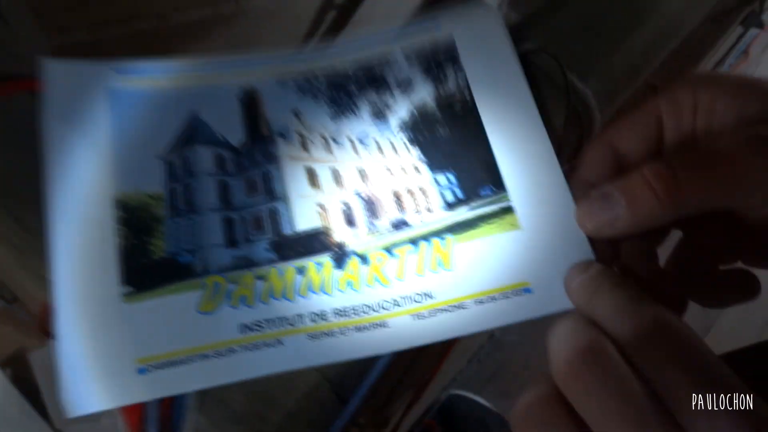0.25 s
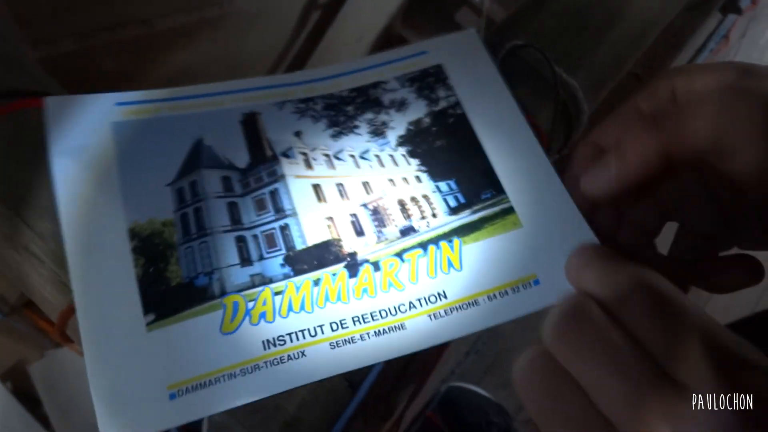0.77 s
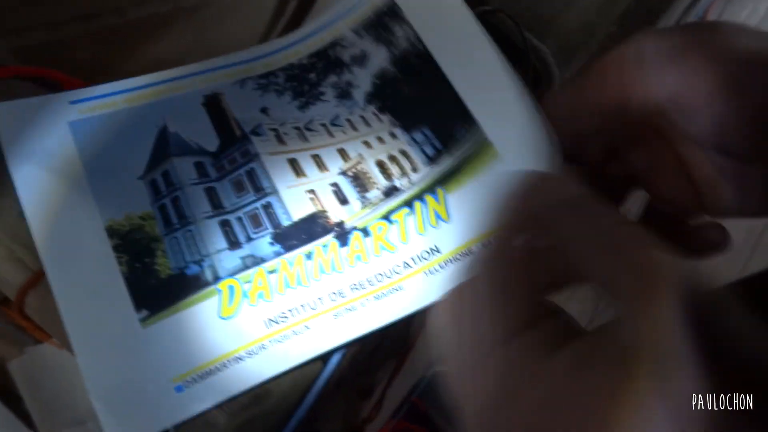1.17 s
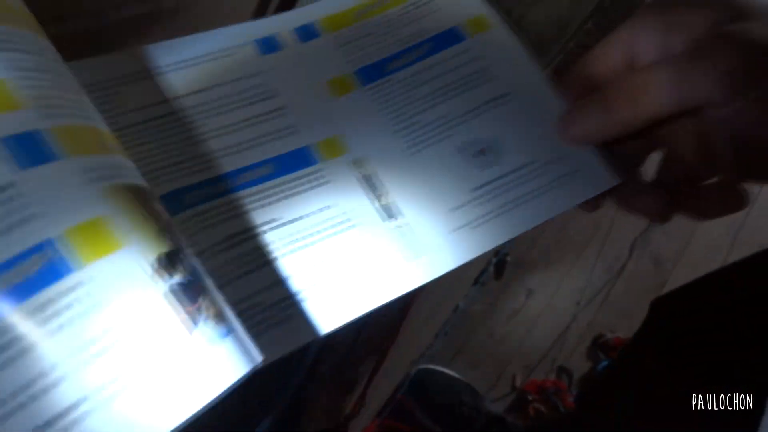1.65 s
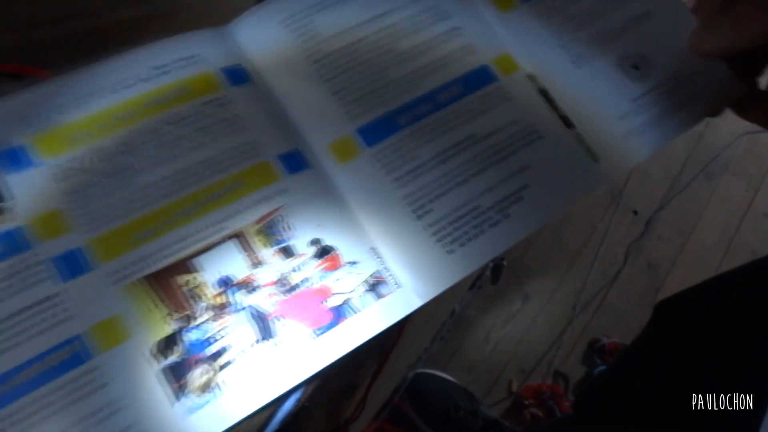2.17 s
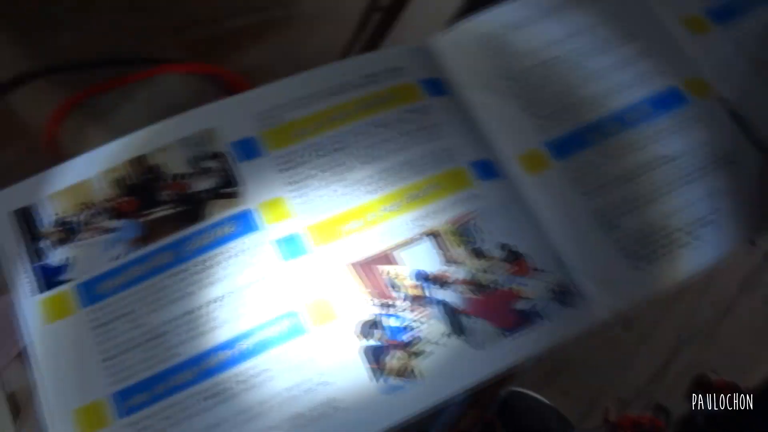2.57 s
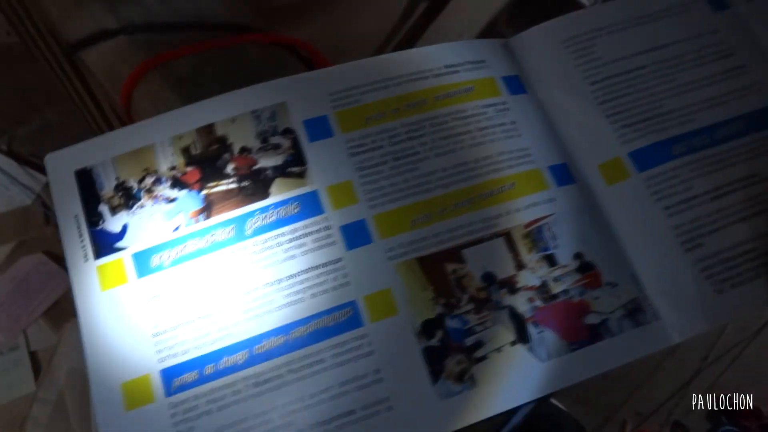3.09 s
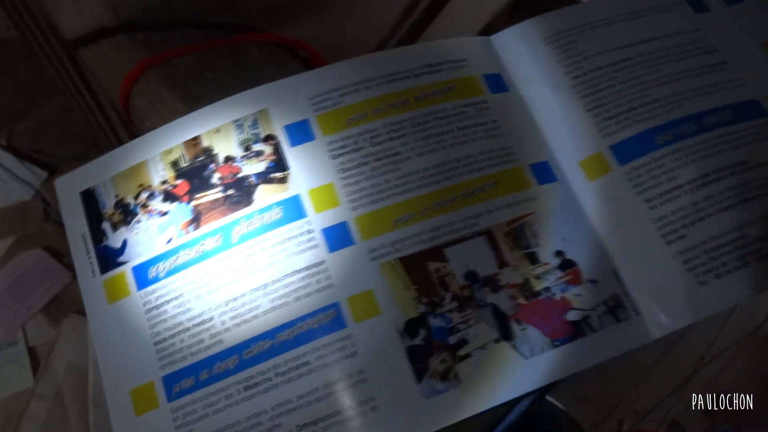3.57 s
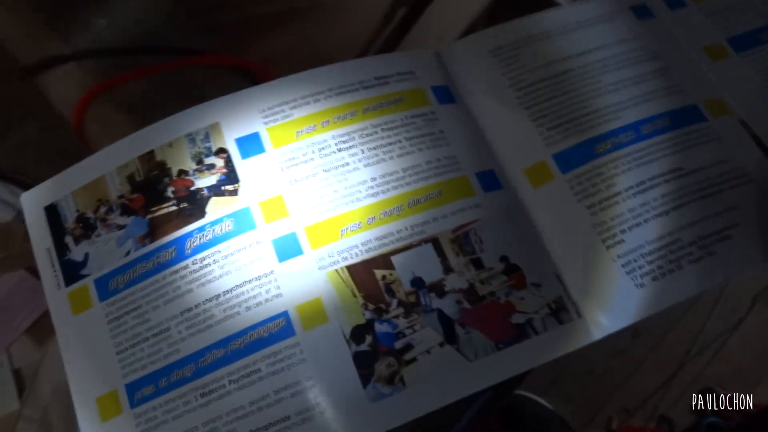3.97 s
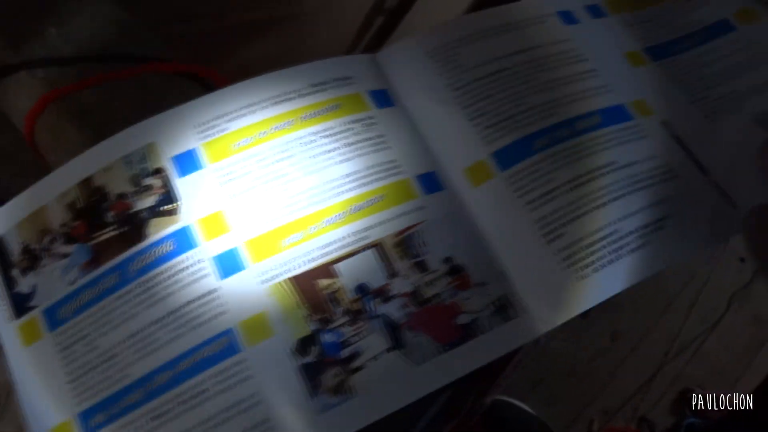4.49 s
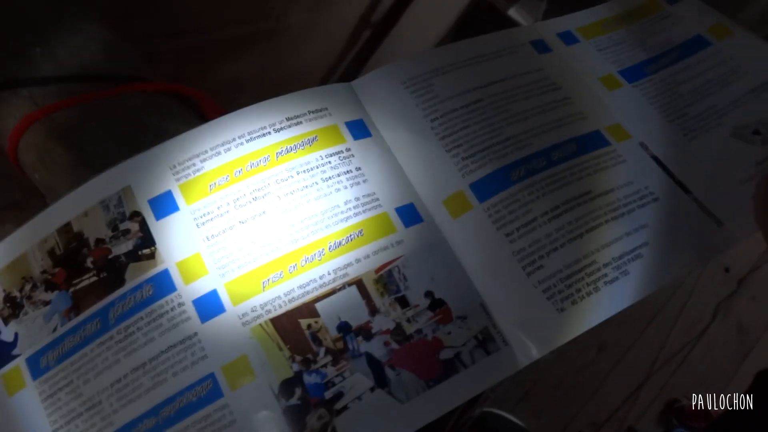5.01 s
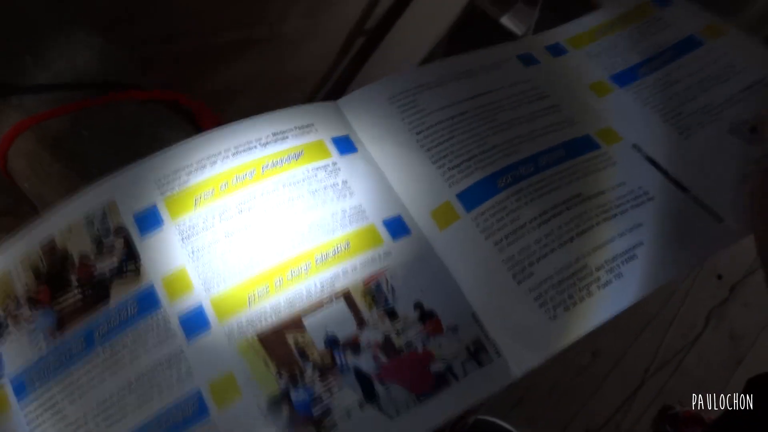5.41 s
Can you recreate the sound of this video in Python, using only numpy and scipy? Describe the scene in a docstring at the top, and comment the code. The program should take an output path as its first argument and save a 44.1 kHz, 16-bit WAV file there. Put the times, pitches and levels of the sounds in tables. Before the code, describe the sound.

Very close to the microphone in a small, quiet room, fingers slide faintly over a glossy brochure and tick its edge. At about two seconds it opens with a loud, crisp swish, snaps and hollow page flaps. Near silence follows, then soft rubbing and a tight burst of crinkles around five seconds, with another snap later.

```python
"""Glossy paper slides under fingers close to the microphone: a brochure opens in a small, quiet room.
Filtered noise and clustered friction clicks make the hiss of each stroke and the brief edge scuffs.
Damped clicks with noisy tails make the crease snaps and the dull pops of the buckling page.
Low filtered noise adds the bending sheet and the shifting hands; sparse echoes and room tone lie behind."""
import sys
import numpy as np
from scipy import signal
from scipy.fft import rfft, irfft
from scipy.io import wavfile
from scipy.ndimage import uniform_filter1d

SR = 44100
rng = np.random.default_rng(int(sys.argv[2]) if len(sys.argv) > 2 else 0)


def generate_wav(signal):
    """Clip the signal to [-1, 1] and save it as 16-bit WAV at the path in sys.argv[1]."""
    frames = np.transpose(np.atleast_2d(signal))
    scaled = np.clip(frames, -1, 1) * 32767
    pcm = np.round(scaled).astype(np.int16)
    wavfile.write(sys.argv[1], SR, pcm)


N = 249027


# strokes of sliding paper: (contact, time of peak [s], length [s], relative level [dB], treble lift [dB])
STROKES = [("cover", 0.021, 0.17, -50, -15), ("cover", .13, 0.083, -52, -6),
           ("cover", 0.337, 0.14, -55.5, -4), ("cover", 0.475, 0.12, -52.5, 2.7),
           ("cover", 0.675, 0.088, -55.5, 3.2), ("cover", 0.788, 0.081, -51.5, 5),
           ("lift", 0.819, 0.075, -47, 5.4), ("lift", 1.0, .21, -45.5, -7), ("lift", 1.116, 0.092, -49, -7),
           ("lift", 1.245, .05, -52.5, -5), ("lift", 1.37, 0.17, -53, 3),
           ("lift", 1.513, 0.31, -53.5, -8.5), ("lift", 1.655, 0.14, -48, -2.5),
           ("lift", 1.74, .14, -44, -7.5), ("sweep", 1.778, .022, -29, 8), ("sweep", 1.809, .05, -26, -1.5),
           ("sweep", 1.883, .06, -27, 5), ("turn", 1.923, .045, -33.5, 2), ("turn", 1.98, 0.1, -30.5, 3.4),
           ("turn", 2.052, .025, -26, -1), ("turn", 2.092, 0.062, -29.5, 8),
           ("turn", 2.135, 0.044, -38.5, 4), ("glide", 2.17, .12, -61, -1),
           ("glide", 2.54, 0.19, -66.5, -1), ("glide", 2.686, 0.19, -61.5, 0),
           ("glide", 3.129, .2, -55, 0.85), ("grip", 3.255, .14, -54.5, 4.3),
           ("grip", 3.475, 0.24, -56.5, 6.7), ("grip", 3.67, .1, -51, -2.5),
           ("grip", 3.73, 0.058, -56.5, 6.3), ("grip", 3.91, 0.13, -65.5, 22), ("grip", 4.02, .11, -52, 9),
           ("grip", 4.14, 0.13, -50.5, 9.4), ("grip", 4.26, .05, -58.5, 20),
           ("grip", 4.33, 0.092, -55.5, 6.7), ("grip", 4.48, 0.11, -41, 1.4),
           ("grip", 4.562, .065, -38, -0.54), ("grip", 4.65, .1, -63, 4), ("grip", 4.715, .04, -41.5, 1.7),
           ("grip", 4.78, 0.065, -45.5, 7.8), ("grip", 4.885, 0.099, -41.5, 6),
           ("grip", 4.985, 0.057, -38.5, 0), ("grip", 5.1, 0.12, -53, 4.1), ("grip", 5.3, 0.043, -49.5, -1),
           ("grip", 5.345, 0.07, -53.5, 5), ("grip", 5.398, 0.024, -42, -1),
           ("grip", 5.485, 0.09, -41.5, -2), ("grip", 5.61, 0.2, -49, 1)]


def stroke(contact, hiss, per_s, smooth, clump_db, band_hz, band_width_hz, band_db, creep_db):
    """Paper slides, and creeps on between strokes: slips clump, one band is shaped, the treble varies."""
    rows = [row[1:] for row in STROKES if row[0] == contact]
    t = np.arange(N) / SR
    between = 1. * (t > rows[0][0]) * (t < rows[-1][0])
    creep = gain_of(creep_db) ** 2 * abs(uniform_filter1d(between, size=SR // 20))
    swells = [swell(s, length, db) for s, length, db, _ in rows]
    power = sum(swells) + creep + 1e-20
    bright_db = sum(part * row[3] for part, row in zip(swells, rows)) / power

    friction = slips(N, per_s, 2.8, smooth) * gain_of(clump_db * wander(N, 0.0044))
    spectrum = read(hiss, bins()) + bumps([(band_hz, band_width_hz, band_db)])
    rub = evened(colour(friction, spectrum))
    highpass = signal.butter(3, 6500, "high", fs=SR, output="sos")
    treble = signal.sosfiltfilt(highpass, rub)
    lift = gain_of(bright_db)
    treble_share = np.mean(treble ** 2)
    # the treble lift changes the tone, while the power is held to the stroke
    level = np.sqrt(power / (1 + treble_share * (lift ** 2 - 1)))
    return (rub + (lift - 1) * treble) * level


# hiss of each contact: (frequency [Hz], relative level [dB per Hz])
COVER_HISS = [(530, -47), (900, -12.5), (1920, -23.5), (2260, -8.5), (2470, -15.5), (4000, -6.5),
              (6340, -8), (7530, 0.5), (8640, -6.5), (9470, 1.5), (10500, -20), (12100, -20), (14000, -63)]
LIFT_HISS = [(880, -49), (1500, -28), (1930, -22), (2810, -13), (3890, -7), (4290, -3.5), (4680, -5),
             (9630, -10), (10500, -21.5), (11900, -22.5), (15000, -43)]
SWEEP_HISS = [(880, -36.5), (1500, -21), (2670, -11), (3670, -3.5), (5050, -3.5), (7870, -6), (9600, -11),
              (10500, -24), (12000, -26), (13200, -53), (15500, -56.5)]
TURN_HISS = [(1180, -30), (2000, -10.5), (2450, -11.5), (2830, -1.5), (3860, 3.5), (6680, 3), (9600, -8),
             (10500, -16), (12000, -18.5), (13200, -38), (15500, -37.5)]
GLIDE_HISS = [(1060, -57.5), (1800, -17), (2290, -5), (2510, -10), (3190, -0.5), (4330, 3.5), (5450, 0),
              (6540, -15), (7980, -2), (9570, -16), (10300, -23.5), (13000, -34)]
GRIP_HISS = [(120, -32.5), (310, -7), (460, -22), (620, -2), (820, -3.5), (1100, -19.5), (1400, -11.5),
             (2160, 0.5), (2800, -3), (3670, 2.5), (6100, -5.5), (9300, -11), (10400, -32), (11900, -29.5),
             (13500, -56)]


def sliding():
    """Fingers on the glassy cover; it lifts, sweeps and turns; a soft glide; a rougher grip on the pages."""
    cover = stroke("cover", COVER_HISS, per_s=2800, smooth=0.86, clump_db=1.6,
                   band_hz=9500, band_width_hz=410, band_db=3.5, creep_db=-68)
    lift = stroke("lift", LIFT_HISS, per_s=3400, smooth=0.87, clump_db=1.0,
                  band_hz=9330, band_width_hz=400, band_db=6.5, creep_db=-65)
    sweep = stroke("sweep", SWEEP_HISS, per_s=2400, smooth=0.62, clump_db=0.3,
                   band_hz=5160, band_width_hz=800, band_db=5.5, creep_db=-43.5)
    turn = stroke("turn", TURN_HISS, per_s=990, smooth=0.49, clump_db=2.0,
                  band_hz=7660, band_width_hz=1200, band_db=-3.5, creep_db=-46.5)
    glide = stroke("glide", GLIDE_HISS, per_s=3600, smooth=0.59, clump_db=1.5,
                   band_hz=9180, band_width_hz=504, band_db=6.5, creep_db=-84.5)
    grip = stroke("grip", GRIP_HISS, per_s=1500, smooth=0.51, clump_db=2.0,
                  band_hz=7315, band_width_hz=460, band_db=10.5, creep_db=-69)
    return cover + lift + sweep + turn + glide + grip


def drifting(x, depth_db):
    """As the sheet changes its curve, the bands that it radiates best shift."""
    z = signal.stft(x, SR, nperseg=512)[2]
    field = rng.standard_normal(z.shape)
    for _ in range(2):
        field = uniform_filter1d(field, size=5, axis=0)   # over frequency
        field = uniform_filter1d(field, size=16, axis=1)  # over time
    return signal.istft(z * gain_of(depth_db * evened(field)), SR, nperseg=512)[1][:N]


# creases that snap: (time [s], relative level [dB], centre [Hz], width [octaves],
# rattle energy against the click [dB])
SNAPS = [(0.0319, -27, 4140, 2.5, -7), (0.039, -32, 4640, 0.68, -20), (0.2687, -37.5, 2720, 0.35, -3),
         (0.3405, -34.5, 3390, 1.4, -5), (0.8439, -27, 4370, 0.089, -12), (1.0659, -28, 3540, 0.44, 8),
         (1.0717, -22.5, 4300, 0.61, -17), (1.14, -20, 4900, 0.5, 0), (1.218, -37.5, 4800, 0.26, 5),
         (1.6051, -23, 5160, 0.37, 2), (1.783, -19, 5540, 0.32, -5), (1.8508, -15.5, 2230, 2.7, -9),
         (2.0342, -11.5, 2280, 1, -4), (2.1321, -15, 5300, 0.25, -11), (2.142, -19, 3640, 0.76, -2.5),
         (3.2558, -39.5, 4500, 0.48, 11.5), (4.0292, -31.5, 6800, 0.2, -5.5),
         (4.3324, -37.5, 3040, 0.35, -13), (4.4009, -28, 3660, 0.45, -1), (4.4221, -22, 3600, 0.45, 2.5),
         (4.4647, -20, 3100, 0.3, -7), (4.8466, -28, 3900, 0.48, 1), (4.9074, -10.5, 3220, 1.1, -1),
         (4.9397, -10, 3030, 0.87, -2.5), (4.955, -6, 4800, 0.61, -16.5), (5.2935, -34, 3340, 0.52, -1),
         (5.4328, -25.5, 2930, 0.34, -3), (5.4392, -8.5, 3180, 0.32, -8.5), (5.4927, -18.5, 3150, 0.35, -5),
         (5.636, -19, 3100, 0.39, -10)]


def snaps(rattle_s=0.0033, onset_s=0.00027):
    """A crease flips in an instant; bending waves rattle on in the sheet for a few milliseconds."""
    out, t = np.zeros(N), np.arange(SR // 25) / SR
    for s, db, hz, octaves, rattle_db in SNAPS:
        click = ring(patch(hz, octaves, skirt=2.9))
        rattle = rng.standard_normal(len(t)) * np.exp(-t / rattle_s) * (1 - np.exp(-t / onset_s))
        drive = gain_of(rattle_db) * rattle / np.linalg.norm(rattle)
        drive[0] = 1
        add(out, s, gain_of(db) * signal.fftconvolve(drive, click) / abs(click).max())
    return out


# bulges that buckle or flap: (time [s], relative level [dB], centre [Hz], width [octaves])
POPS = [(0.599, -52, 1290, 0.23), (1.056, -44.5, 800, 0.44), (1.071, -47, 248, 0.55),
        (1.3023, -47, 940, 0.58), (1.606, -40.5, 446, 0.53), (1.8502, -27.5, 940, 0.34),
        (1.9174, -17, 550, 1.1), (1.9678, -14, 990, 1.3), (2.0469, -13.5, 1060, 0.45),
        (2.056, -13, 1400, 0.59), (2.0712, -10.5, 1020, 0.59), (2.0766, -8, 870, 0.96),
        (2.1107, -9.5, 400, 0.93), (2.1323, -29.5, 300, 0.42), (2.183, -35.5, 245, 0.47),
        (2.191, -33, 1150, 0.25), (2.1932, -32.5, 450, 0.53), (2.27, -49.5, 380, 0.31),
        (2.7174, -49, 986, 0.52), (4.963, -27.5, 507, 0.48), (4.975, -21, 546, 0.58),
        (4.9847, -22.5, 640, 0.55), (4.992, -33, 347, 0.57), (5.045, -44, 394, 0.36),
        (5.062, -47, 382, 0.52)]


def pops(skirt=2.91, flutter_s=0.0028, flutter_db=3.5):
    """A wide bulge of the page turns inside out and pushes the air; the page flutters after it."""
    out, t = np.zeros(N), np.arange(SR // 20) / SR
    for s, db, hz, octaves in POPS:
        push = ring(patch(hz, octaves, skirt))
        flutter = rng.standard_normal(len(t)) * np.exp(-t / flutter_s)
        drive = gain_of(flutter_db) * flutter / np.linalg.norm(flutter)
        drive[0] = -1
        add(out, s, gain_of(db) * signal.fftconvolve(drive, push) / abs(push).max())
    return out


# an edge slips briefly over a finger or a page:
# (middle [s], length before stretching [s], relative level [dB], centre [Hz], width [octaves])
SCUFFS = [(0.805, 0.018, -37, 5900, 0.16), (0.819, 0.015, -37.5, 5270, 0.095),
          (0.849, 0.014, -43, 4670, 0.2), (0.985, 0.012, -29, 5040, 0.26), (1.007, 0.013, -42.5, 4640, 0.4),
          (1.049, 0.011, -34, 5400, 0.41), (1.238, 0.019, -43.5, 5500, 0.48), (4.428, 0.01, -39, 3990, 0.4),
          (4.469, 0.016, -38.5, 3730, 0.51), (4.953, 0.021, -32.5, 3760, 0.47),
          (4.982, 0.013, -28, 1370, 0.95), (5.029, 0.014, -43, 3320, 0.54), (5.391, 0.017, -40, 3950, 0.62)]


def scuffs(stretch=1.5):
    """A quick run of slips swells and fades in one patch of paper."""
    out = np.zeros(N)
    for s, length, db, hz, octaves in SCUFFS:
        run = slips(SR // 10, per_s=3000, spread_db=3., smooth=.4)
        run = colour(run, patch(hz, octaves, skirt=3.4))[:int(stretch * length * SR)]
        fade = np.sin(np.linspace(0, np.pi, len(run))) ** 1.5
        add(out, s - stretch * length / 2, gain_of(db) * evened(run) * fade)
    return out


# colour shared by snaps, pops and scuffs: (frequency [Hz], relative level [dB])
PAPER = [(30, -23.5), (150, 5), (400, 2), (5000, 6.5), (6300, 4.5), (7400, 6), (9500, 7), (10400, -5.5),
         (12000, -3), (13200, -22), (16000, -29.5)]


def patch(hz, octaves, skirt):
    """Spectrum in dB of a small patch of paper: one broad, heavily damped resonance."""
    away = np.log2((bins() + 1) / hz) / octaves
    return read(PAPER, bins()) - skirt * 10 * np.log10(1 + away ** 2 / (2 * skirt))


# first reflections, off the facing page, the hands and the body: (delay [ms], gain [dB])
NEAR = [(0.54, -13), (1.3, -28), (2.3, -21), (3.7, -19.5), (5.6, -21)]


def nearby(x):
    """Close surfaces comb the sound into bands."""
    taps = np.zeros(SR // 100)
    taps[0] = 1
    for ms, db in NEAR:
        taps[round(ms / 1000 * SR)] += gain_of(db)
    return signal.oaconvolve(x, taps / np.linalg.norm(taps))[:N]


# hollow sound of the bending sheet: (frequency [Hz], relative level [dB per Hz])
SHEET = [(40, -31), (100, -20.5), (170, -7), (330, 3), (520, -3), (800, -2), (1250, 1), (1650, -4.5),
         (1950, -5.5), (3000, -12.5), (6000, -47), (12000, -82)]
# bends of the whole sheet: (time of peak [s], length [s], relative level [dB])
BENDS = [(.01, 0.19, -60), (1.076, .12, -64), (1.63, .08, -65), (1.85, .08, -41), (1.92, 0.05, -32),
         (1.988, 0.092, -31), (2.08, 0.069, -28.5), (2.222, 0.19, -62), (3.27, .08, -68), (4.465, .18, -53),
         (4.969, 0.049, -40.5), (5.025, .13, -55), (5.44, .1, -51)]
# the held sheet never lies quite still, but it calms down
UNREST_DB, CALMING_DB_PER_S = -70, 2.5


def flexing():
    """Many small buckles drum on the bending sheet."""
    unrest = gain_of(UNREST_DB - CALMING_DB_PER_S * np.arange(N) / SR)
    buckles = slips(N, per_s=700, spread_db=0.5, smooth=0.23) * gain_of(2.7 * wander(N, 0.0058))
    level = np.sqrt(unrest ** 2 + sum(swell(*row) for row in BENDS))
    return evened(colour(buckles, read(SHEET, bins()))) * level


# narrow peaks that give the bending and popping an uneven, hollow tone:
# (frequency [Hz], width [Hz], relative lift [dB])
TONE_PEAKS = [(199, 9.5, 1), (239, 14, 5), (333, 43, 3), (407, 50, 1), (783.6, 20, 8.5), (842, 28, 6),
              (1000, 18, 4.5), (1194, 9.8, 0.5), (1256, 16, 4.5), (1470, 28, 5.5), (1670, 19, 8)]


def uneven_tone(x):
    """Narrow peaks make the low paper sounds uneven and hollow."""
    return colour(x, bumps(TONE_PEAKS))


# soft rumble of skin on paper: (frequency [Hz], relative level [dB per Hz])
SKIN = [(20, -10.5), (50, -7), (90, -0.5), (150, -4.5), (230, 1.5), (320, -16), (600, -10.5), (1500, -41),
        (5000, -65)]
# the hands shift against the brochure: (time of peak [s], length [s], level [dB])
SHIFTS = [(.3, 1.0, -67), (1.093, 0.29, -66), (2.147, 0.95, -66), (3.273, 0.34, -74), (4.472, .35, -71),
          (5.003, 0.15, -58.5), (5.43, .13, -60)]


def handling():
    """Skin drags dully on the paper as the hands move."""
    drag = rng.standard_normal(N) * gain_of(2 * wander(N, 0.027))
    return evened(colour(drag, read(SKIN, bins()))) * np.sqrt(sum(swell(*row) for row in SHIFTS))


# every movement: share of its length spent rising, bluntness of its top, dB lost at its two ends
RISE_SHARE, BLUNT, ENDS_DB = 0.51, 1.46, 9


def swell(s, length, db):
    """Power over time of one movement that gathers speed until s and then stops."""
    power = np.zeros(N)
    at = np.arange(max(int((s - 2 * length) * SR), 0), min(int((s + 2 * length) * SR), N))
    away = (at / SR - s) / length
    from_peak = np.maximum(-away / RISE_SHARE, away / (1 - RISE_SHARE))
    power[at] = gain_of(db - ENDS_DB * from_peak ** BLUNT) ** 2
    return power


def slips(count, per_s, spread_db, smooth):
    """Stick-slip friction: tiny slips of uneven size over a smooth share of noise."""
    size = gain_of(spread_db * np.minimum(rng.exponential(1, count), 3))
    clicks = size * rng.choice([-1, 1], count) * (rng.random(count) < per_s / SR)
    return np.sqrt(1 - smooth) * evened(clicks) + np.sqrt(smooth) * rng.standard_normal(count)


# stereo width of near sound at the two ports: (frequency [Hz], side minus mid [dB])
WIDTH = [(60, -31.5), (700, -17.5), (3000, -25), (6000, -50), (8800, -14.5), (10500, -11), (14000, -20.5)]


def ports(x):
    """Two close microphone ports hear the same sound with a slight phase difference."""
    hz = np.fft.rfftfreq(N, 1 / SR)
    side = irfft(1j * rfft(x) * gain_of(read(WIDTH, hz)), N)
    return np.array([x + side, x - side])


# reverberation: (frequency [Hz], time to fall by 60 dB [s])
ROOM = [(120, 0.21), (400, 0.77), (1000, 0.17), (3000, 0.18), (8000, 0.22), (14000, 0.36)]


def room(x, wet_db):
    """Sparse reflections of random sign die away at a rate that depends on frequency."""
    taps = rng.choice([-1., 1.], (2, SR // 2)) * (rng.random((2, SR // 2)) < 3000 / SR)
    taps[:, :SR // 250] = 0  # no reflection in the first 4 ms
    hz, t, z = signal.stft(taps, SR, nperseg=256)
    decay = gain_of(-60 * t / read(ROOM, hz)[:, None])
    tail = signal.istft(z * decay, SR, nperseg=256)[1]
    tail = around(*tail / np.linalg.norm(tail[0]))
    return gain_of(wet_db) * signal.fftconvolve(x[None], tail, axes=1)[:, :N]


# room tone: (frequency [Hz], relative level [dB per Hz])
AIR = [(20, -2), (235, -2), (300, -6.5), (460, -1.5), (600, -9.5), (1270, -10.5), (1800, -14), (2300, -6.5),
       (4000, -7.5), (6200, -15.5), (9400, -14), (15000, -43.5)]
AIR_DB = -71


def air():
    """The faint, steady tone of the room."""
    hz = np.fft.rfftfreq(N, 1 / SR)
    tone = irfft(rfft(rng.standard_normal((2, N))) * gain_of(read(AIR, hz)), N)
    return gain_of(AIR_DB) * around(*evened(tone))


# stereo width of sound from all around: (frequency [Hz], gain of the side signal [dB])
DIFFUSE = [(60, -14.5), (200, -8.5), (700, 0), (1300, 3.5), (2400, -2.5), (4400, -9.5), (15000, -15)]


def around(mid, side):
    """Left and right for sound that arrives from all directions."""
    hz = np.fft.rfftfreq(len(mid), 1 / SR)
    side = irfft(rfft(side) * gain_of(read(DIFFUSE, hz)), len(mid))
    return np.array([mid + side, mid - side])


def gain_of(db):
    """Decibels to amplitude."""
    return 10 ** (np.asarray(db) / 20)


def evened(x):
    """Scales to an rms of 1."""
    return x / np.sqrt(np.mean(x ** 2) + 1e-20)


def wander(count, seconds):
    """Smooth random curve of rms 1: noise averaged twice over the given time."""
    size = max(int(seconds * SR), 1)
    return evened(uniform_filter1d(uniform_filter1d(rng.standard_normal(count), size), size))


def add(mix, s, sound):
    """Adds a sound to the mix at time s."""
    part = mix[max(round(s * SR), 0):][:len(sound)]
    part += sound[:len(part)]


def bins(size=2048):
    """Frequencies of a short spectrum."""
    return np.fft.rfftfreq(size, 1 / SR)


def read(points, hz):
    """Reads a spectrum on a logarithmic frequency axis."""
    f, value = np.transpose(points)
    return np.interp(np.log(hz + 1), np.log(f + 1), value)


def bumps(peaks):
    """Spectrum in dB of a few peaks or dips (frequency [Hz], width [Hz], lift [dB])."""
    return sum(db / (1 + (2 * (bins() - hz) / width) ** 2) for hz, width, db in peaks)


def ring(db):
    """The causal impulse response, of energy 1, that has the spectrum db."""
    # folding the cepstrum forward in time gives minimum phase
    cepstrum = irfft(np.log(gain_of(np.maximum(db, db.max() - 100))))
    half = len(cepstrum) // 2
    cepstrum[1:half] *= 2
    cepstrum[half + 1:] = 0
    response = irfft(np.exp(rfft(cepstrum)))[:half]
    return response / np.linalg.norm(response)


def colour(x, db):
    """Filters x by the spectrum db, keeping its length."""
    return signal.oaconvolve(x, ring(db))[:len(x)]


def scene():
    """Crisp and hollow paper sounds, close by, with a little of the room."""
    hiss = drifting(sliding(), depth_db=1.8)
    crisp = gain_of(-1.12) * hiss + nearby(snaps() + scuffs())
    hollow = gain_of(-2.5) * uneven_tone(flexing() + pops())
    close = ports(crisp + hollow + handling())
    return close + room(crisp, wet_db=-25.5) + room(hollow, wet_db=-18.0) + air()


def record(dry):
    """A steep, linear-phase low-pass limits the band to 16 kHz."""
    lowpass = signal.firwin(511, 16000, window=("kaiser", 9), fs=SR)
    return signal.oaconvolve(dry, lowpass[None], "same")


dry = scene()
out = record(dry)
generate_wav(out)
```